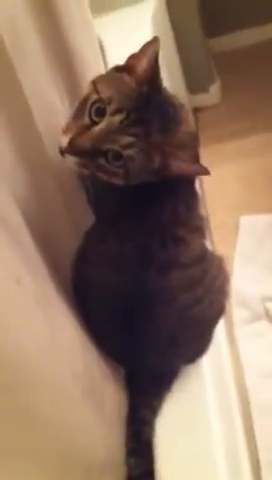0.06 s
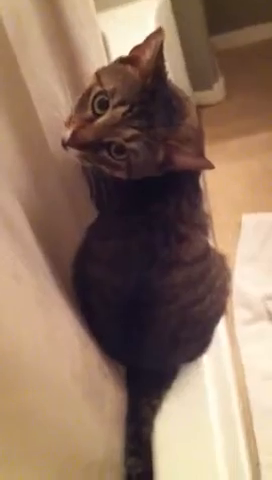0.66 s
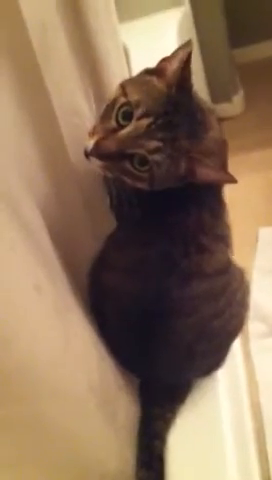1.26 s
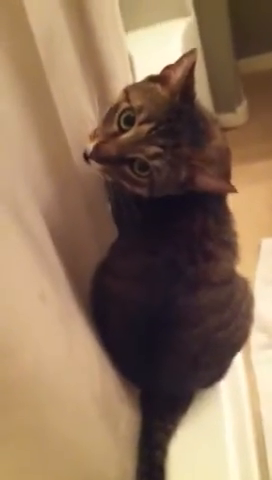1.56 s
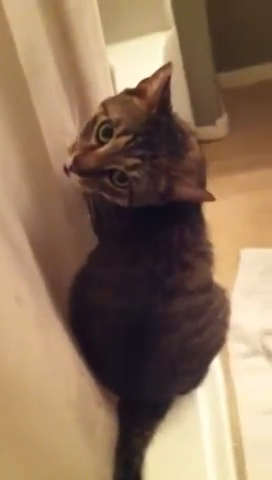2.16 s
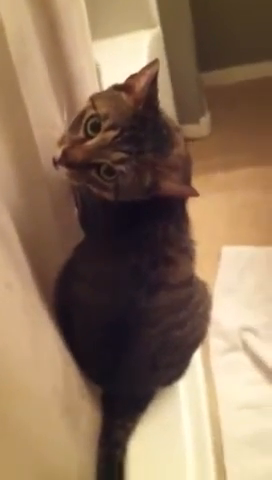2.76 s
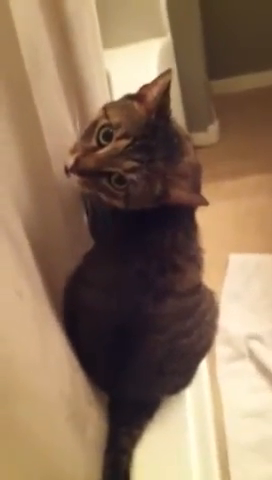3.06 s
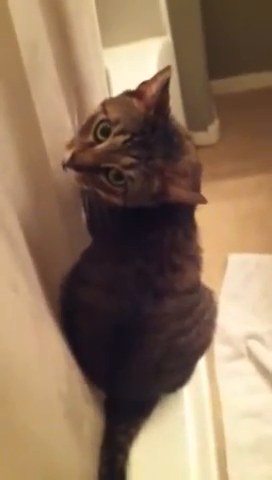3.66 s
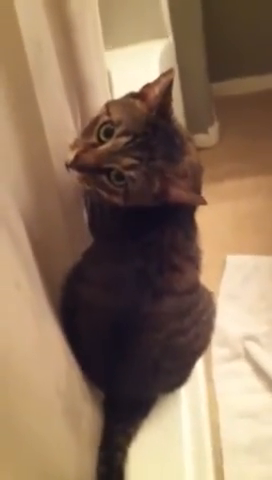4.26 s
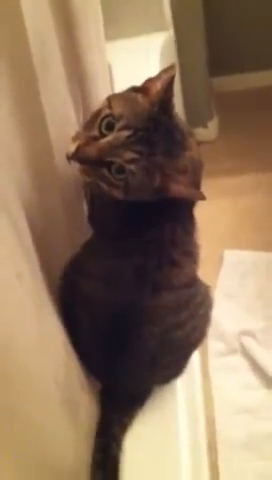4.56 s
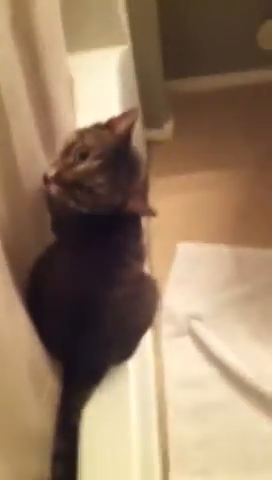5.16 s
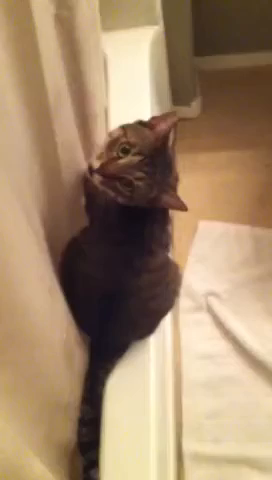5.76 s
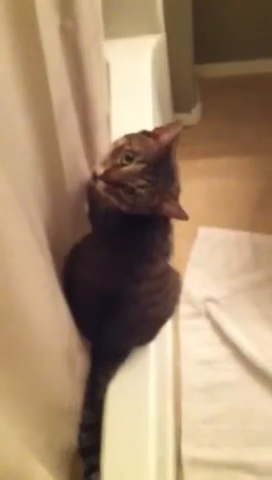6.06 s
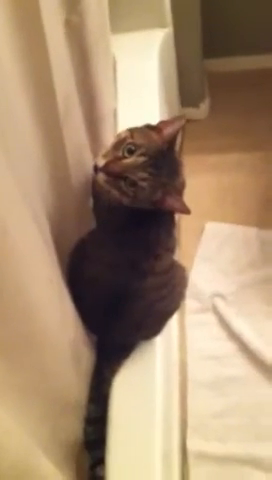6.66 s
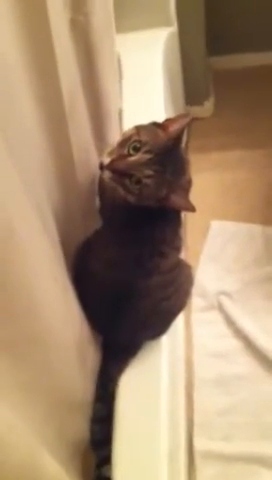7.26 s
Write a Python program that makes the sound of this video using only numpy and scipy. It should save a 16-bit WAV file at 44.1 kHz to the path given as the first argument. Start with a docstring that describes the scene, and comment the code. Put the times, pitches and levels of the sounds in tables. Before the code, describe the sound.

A shower is already running at the start and continues without a break for about seven and a half seconds. The main sound is a bright, even hiss with a dense patter of fine drops landing in a bathtub, fluttering slightly in strength. Beneath it lie a softer, dull wash of water drumming on the tub, tiny bubbling plinks and a barely audible low rumble. Heavier drops slap lightly through the spray at irregular moments, for example around 0.8, 1.8, 2.6, 3.6 to 4.4 and 6.7 seconds, with faint drips in between. From about 5.9 to 6.9 seconds the drain gives a few very faint, hollow gulps, mostly covered by the water. The bathroom is small and hard-walled, with a short echo. Everything is heard in mono, as from a phone just outside the shower curtain.

```python
"""Shower spray patters and hisses into a bathtub in a small, hard-walled bathroom.
Thousands of drops land each second; now and then a fat one slaps down and scatters droplets.
Underneath, trapped bubbles plink, the drummed tub gives a dull wash, the drain gurgles faintly
and the house rumbles. A phone hears it in mono from outside the curtain."""
import sys
import numpy as np
from scipy import signal
from scipy.fft import rfft, irfft
from scipy.io import wavfile
from scipy.ndimage import uniform_filter1d

SR = 44100
rng = np.random.default_rng(int(sys.argv[2]) if len(sys.argv) > 2 else 0)


def inscribe(sig):
    """Save sig as 16-bit PCM at rate SR to the path in sys.argv[1].

    A 1-D sig is mono; a 2-D sig holds one channel per row.
    Samples are clipped to [-1, 1] before scaling.
    """
    pcm = np.round(np.clip(np.atleast_2d(sig).T, -1, 1) * 32767)
    wavfile.write(sys.argv[1], SR, pcm.astype(np.int16))


N = 322812
ROOM_T60_S, TOP_HZ = .45, 15750


def undb(db):
    """Decibels to gain."""
    return 10 ** (np.asarray(db) / 20)


def level(x, db):
    """Set x to an rms level."""
    return x * undb(db) / np.sqrt(np.mean(x ** 2) + 1e-30)


def curves(table):
    """Automation lanes from a timed table, one value a sample."""
    times, *columns = np.transpose(table)
    return [np.interp(np.arange(N) / SR, times, column) for column in columns]


def bin_hz(x):
    """Frequency of each spectral bin of x."""
    return np.maximum(np.fft.rfftfreq(len(x), 1 / SR), 1)


def colour(x, points):
    """EQ x along a curve of (f/Hz, level/dB) points."""
    hz, db = np.transpose(sorted(points))
    eq_db = np.interp(np.log(bin_hz(x)), np.log(hz), db)
    return irfft(rfft(x) * undb(eq_db), len(x))


def band(x, lo_hz, hi_hz):
    """Band-pass with equal-power crossovers."""
    hz = bin_hz(x)
    share = 1 / (1 + (lo_hz / hz) ** 20) / (1 + (hz / hi_hz) ** 20)
    return irfft(rfft(x) * np.sqrt(share), len(x))


def resonate(x, hz, width_hz):
    """A resonance applied twice, for steep skirts."""
    hz, width_hz = min(hz, SR * .45), min(width_hz, SR / 3)
    b, a = signal.iirpeak(hz, hz / width_hz, fs=SR)
    return signal.lfilter(b, a, signal.lfilter(b, a, x))


def wobble(rate):
    """Slewed random sample-and-hold, rate steps a second; spread near 1."""
    hold = max(int(SR / rate), 1)
    steps = np.repeat(rng.standard_normal(N // hold + 1), hold)
    return uniform_filter1d(steps, hold)[:N] * np.sqrt(3 / 2)


def impacts(rate, spread_db, size=N):
    """Random clicks, rate a second, most small and a few large."""
    hits = rng.random(size) < rate / SR
    strength = undb(spread_db * np.minimum(rng.exponential(size=size), 5))
    return hits * strength * rng.choice([-1, 1], size)


def room_decay(t):
    """The diffuse tail builds within milliseconds and dies away; unit energy."""
    shape = np.exp(-np.log(1000) * t / ROOM_T60_S) * (1 - np.exp(-t / .0018))
    return shape / np.linalg.norm(shape)


# early reflections off tub and walls: nominal delay/s, gain
REFLECTIONS = [(.0021, .4), (.0074, 0.83), (0.0157, .35)]
def bathroom(x, tail_db):
    """One landing spot: direct sound, hard early echoes and its own diffuse tail."""
    t = np.arange(len(x)) / SR
    response = rng.standard_normal(len(t)) * room_decay(t) * undb(tail_db)
    response[0] += 1
    for delay_s, gain in REFLECTIONS:
        response[int(delay_s * rng.uniform(.8, 1.2) * SR)] += gain
    return signal.fftconvolve(x, response)[:len(x)]


# EQ of the house rumble: f/Hz, relative level/dB
RUMBLE_EQ = [(5, 6), (22, 4), (33, -25), (45, -14), (65, -18), (110, -28), (400, -90)]
def house_rumble():
    """The house lays a faint bed of low noise."""
    return level(colour(rng.standard_normal(N), RUMBLE_EQ), -89)


# hollow gulps in the drain: t/s, peak level/dB, f/Hz, length/s
GULPS = [(5.89, -74, 383, 0.14), (5.917, -71, 434, .15), (6.08, -71, 448, 0.12), (6.175, -73, 441, .14),
         (6.56, -68, 426, 0.13), (6.657, -74, 418, 0.22)]
def drain(waver):
    """Gulps of air ring the drain pipe; each swells, wavers in pitch and fades."""
    t = np.arange(N) / SR
    out = np.zeros(N)
    for start_s, db, hz, length_s in GULPS:
        swell = np.sin(np.pi * np.clip((t - start_s) / length_s, 0, 1))
        phase = 2 * np.pi * np.cumsum(hz * (1 + waver * wobble(70))) / SR
        out += undb(db) * swell * np.sin(phase)
    return out


# EQ of the tub's wash: f/Hz, relative level/dB
WASH_EQ = [(41, -53), (70, -27.5), (140, -4.5), (354, -3), (426, -4.5), (467, -3), (709, -3.5), (1080, -3),
           (1360, -2.5), (2800, -3.5), (3640, -16.5), (6160, -120)]
# body resonances of the tub: f/Hz, width/Hz, rms level/dB
TUB_RINGS = [(141, 13, -88.5), (431.6, 32, -85.5), (1078, 98, -83), (1249, 42, -86)]
def tub():
    """Spray drums on the wet tub: a dull wash with a few broad resonances."""
    drumming = impacts(9000, spread_db=3.4) * undb(.5 * wobble(20))
    rings = sum(level(resonate(drumming, hz, width), db) for hz, width, db in TUB_RINGS)
    wash = colour(impacts(9000, spread_db=1.93), WASH_EQ)
    return level(wash, -63.7) + rings


def bubbles(rate, lo_hz, hi_hz, cycles, spread_db, rise, db):
    """Drops trap air in the film of water; each bubble rings down as its pitch rises."""
    t = np.arange(SR // 20) / SR
    out = np.zeros(N + len(t))
    for when, pitch, strength in rng.random((int(rate * N / SR), 3)):
        hz = lo_hz * (hi_hz / lo_hz) ** pitch
        age = t * hz / cycles
        phase = 2 * np.pi * np.cumsum(hz * (1 + rise * np.minimum(age, 2))) / SR
        start = int(when * N)
        out[start:start + len(t)] += undb(spread_db * strength ** 2) * np.exp(-age) * np.sin(phase)
    wet = bathroom(out[:N], tail_db=-2)
    return level(band(wet, lo_hz * .8, hi_hz * 1.25), db)


def splat(hz, width_hz, spatter_db, slap_s=.0017, scatter_s=.019):
    """A drop slaps and throws droplets that land just after; a narrow band is a bubble ringing."""
    t = np.arange(SR // 3) / SR
    slap = rng.standard_normal(len(t)) * np.exp(-t / slap_s)
    droplets = impacts(4000, spread_db=2, size=len(t)) * np.exp(-t / scatter_s)
    hit = resonate(level(slap, 0) + level(droplets, spatter_db), hz, width_hz)
    # a drop makes next to nothing an octave under its main pitch
    return band(bathroom(hit, tail_db=-.5), hz * .56, TOP_HZ)


def land(cues, trim_db=-12.5):
    """Land one splat on each cue, all through a common trim."""
    out = np.zeros(N + SR)
    for start_s, db, hz, width_hz, spatter_db in cues:
        hit = level(splat(hz, width_hz, spatter_db), db + trim_db)
        start = int(start_s * SR)
        out[start:start + len(hit)] += hit
    return out[:N]


def stray_drops(rate, top_db, range_db, lo_hz, hi_hz, width_hz, spatter_db):
    """Smaller drops land with random timing, strength and pitch; top_db is pre-trim."""
    cues = []
    for when, faint, pitch in rng.random((int(rate * N / SR), 3)):
        hz = lo_hz * (hi_hz / lo_hz) ** pitch
        cues.append((when * N / SR, top_db - range_db * faint, hz, width_hz, spatter_db))
    return land(cues)


# fat drop hits: t/s, pre-trim level/dB, f/Hz, width/Hz, spatter against slap/dB
FAT_DROP_CUES = [(.715, -49, 4600, 3000, -1), (.852, -47.5, 5400, 2000, -7), (1.609, -62, 2920, 300, -8),
                 (1.8, -43, 9250, 10000, -2), (2.011, -46, 4900, 1500, -7), (2.294, -45, 6500, 3500, 0),
                 (2.468, -52, 4300, 700, -4), (2.631, -40.5, 9350, 4000, 11), (3.089, -48, 4160, 1800, -10),
                 (3.125, -47, 13500, 5500, 0), (3.213, -46.5, 7000, 10000, -4),
                 (3.62, -42.5, 7200, 8000, 0), (3.81, -44.5, 7400, 5500, 3), (3.996, -44, 9600, 10000, 5),
                 (4.179, -45, 4870, 3000, 2), (4.325, -47.5, 5170, 4000, -6), (4.37, -45, 8800, 7500, -4),
                 (4.565, -49, 9500, 10000, -6), (5.164, -50, 13400, 10000, 0),
                 (6.197, -49.5, 4800, 3500, -9.5), (6.226, -56, 4450, 400, -8), (6.43, -48, 8200, 5500, -2),
                 (6.732, -43, 5250, 2800, -8), (6.765, -48, 6000, 1800, 5), (7.059, -45, 12400, 10000, -6),
                 (7.258, -47, 8400, 7500, -2)]
def fat_drops():
    """The fattest drops and drips slap down as accents in the spray."""
    return land(FAT_DROP_CUES)


def spurts(rate, decay_s):
    """The jets surge at random: sudden attack, short decay; mean 0, spread 1."""
    kicks = (rng.random(N) < rate / SR) * 1.
    decay = np.exp(-np.arange(N) / SR / decay_s)
    surge = irfft(rfft(kicks) * rfft(decay), N)
    return level(surge - surge.mean(), 0)


# EQ of the spray: f/Hz, relative level/dB
SPRAY_EQ = [(1400, -23.5), (2400, -13), (3050, -9), (3750, -5), (4300, -4), (4800, -1), (6600, -2),
            (7600, -4), (10500, -4.5), (13200, -0.4), (15800, 0.5)]
def drops(rate, band_hz, clumps_db, spread_db, burst_s, tail_db):
    """One size of drop: short bursts whose echoes from countless spots merge into a noisy tail."""
    t = np.arange(SR // 3) / SR
    burst = np.exp(-t / burst_s)
    drop_power = burst ** 2 / np.sum(burst ** 2) + (room_decay(t) * undb(tail_db)) ** 2
    hits = impacts(rate, spread_db) * undb(clumps_db)
    # tails wrap round: the water is already running, so the room is full from the start
    energy = irfft(rfft(hits ** 2) * rfft(drop_power, N), N)
    patter = rng.standard_normal(N) * np.sqrt(np.maximum(energy, 0))
    return level(band(colour(patter, SPRAY_EQ), *band_hz), 0)


# band edges around the heavy, light and mist layers: f/Hz
CROSSOVERS = [1000, 7200, 11800, 20000]
# slow swell of the spray: t/s, heavy base level/dB, mist base level/dB
SPRAY_SWELL = [(0.0, -53, -50), (0.12, -51.0, -49), (0.58, -53.0, -52.5), (0.74, -49.0, -48.5),
               (0.95, -51.5, -52.5), (1.1, -49.5, -47), (1.31, -53.0, -53.5), (1.44, -52.0, -49.5),
               (2.1, -51.5, -49.5), (2.42, -51.5, -50.5), (3.1, -50.5, -48.5), (4.1, -51, -50.5),
               (4.48, -49.5, -49.5), (5.0, -52.0, -50.5), (5.3, -49.5, -47.5), (5.88, -51.5, -52.0),
               (6.08, -52, -48), (6.24, -51.5, -51.5), (6.7, -51.5, -50.5), (7.32, -51.5, -50.5)]
def spray():
    """Heavy drops patter, light ones crackle, mist hisses; all share the jets' spurts and clumps."""
    heavy_db, mist_db = curves(SPRAY_SWELL)
    light_db = heavy_db + .71 * (mist_db - heavy_db)  # mostly follows the mist
    surge = spurts(rate=22, decay_s=.022)
    clumps_db = wobble(35) + .63 * wobble(500)
    heavy = drops(3000, CROSSOVERS[:2], .5 * clumps_db, spread_db=1.9, burst_s=.00098, tail_db=-.27)
    light = drops(5500, CROSSOVERS[1:3], 1.2 * clumps_db, spread_db=2.15, burst_s=.00022, tail_db=-1.2)
    mist = drops(7000, CROSSOVERS[2:], 1.05 * clumps_db, spread_db=3.2, burst_s=.00015, tail_db=-1.7)
    heavy *= undb(heavy_db + .3 * surge - .5)
    light *= undb(light_db + .93 * surge - .97)
    mist *= undb(mist_db + surge + 3.5)
    return heavy + light + mist


def scene():
    """Mix the water over the house rumble, the same in both channels."""
    rumble = house_rumble()
    water = spray() + fat_drops() + tub() + drain(waver=.0203)
    plinks = bubbles(rate=160, lo_hz=3560, hi_hz=7300, cycles=4.6, spread_db=8, rise=.024, db=-62.5)
    burble = bubbles(rate=70, lo_hz=902, hi_hz=3217, cycles=16, spread_db=11, rise=.017, db=-74.5)
    splashes = stray_drops(rate=4, top_db=-50, range_db=9,
                           lo_hz=6400, hi_hz=13500, width_hz=6200, spatter_db=-9)
    # drips into the standing water ring briefly
    drips = stray_drops(rate=7, top_db=-54.5, range_db=8,
                        lo_hz=3880, hi_hz=6800, width_hz=800, spatter_db=-10)
    mono = water + plinks + burble + splashes + drips + rumble
    return np.array([mono, mono])


def record(dry):
    """The phone cuts the top end steeply."""
    return signal.sosfilt(signal.ellip(12, .1, 80, TOP_HZ, fs=SR, output="sos"), dry)


dry = scene()
out = record(dry)
inscribe(out)
```